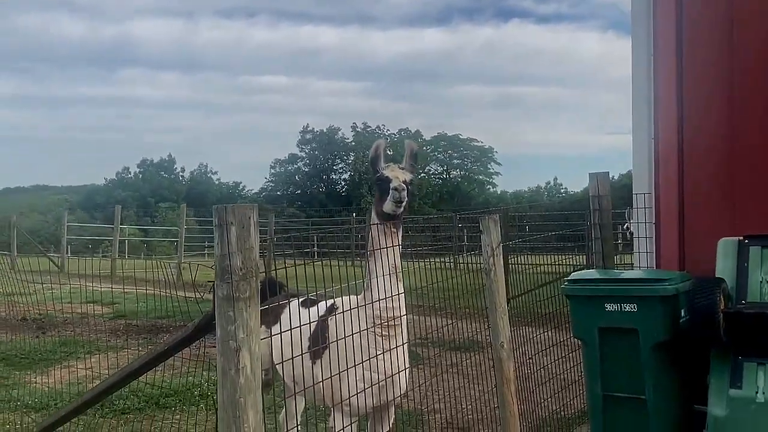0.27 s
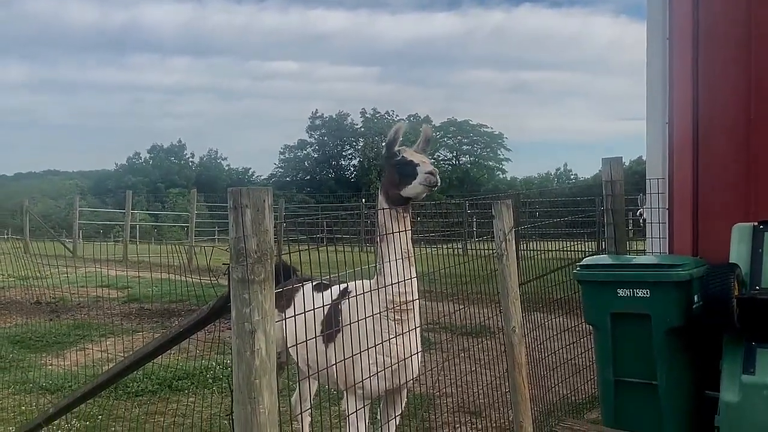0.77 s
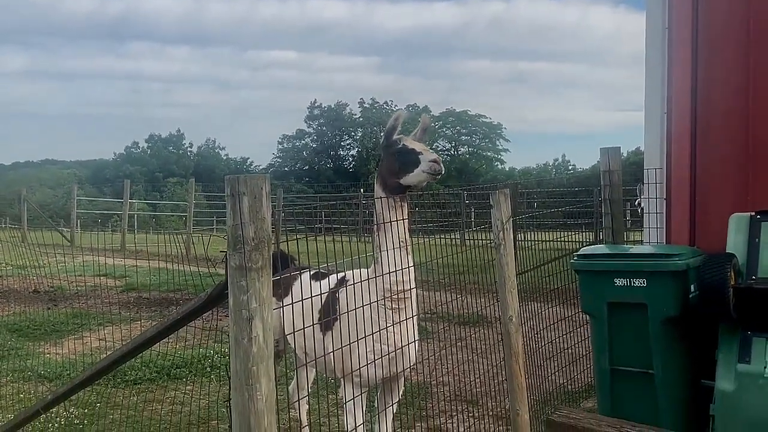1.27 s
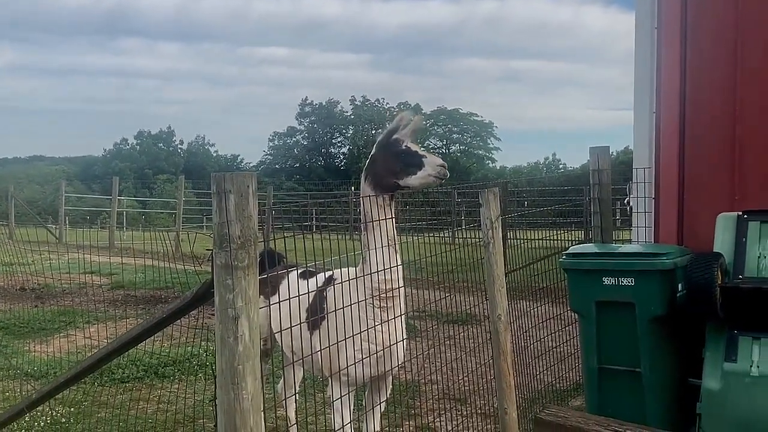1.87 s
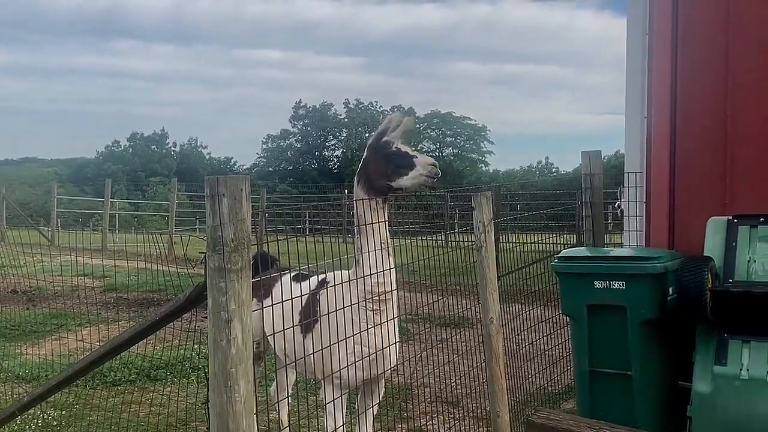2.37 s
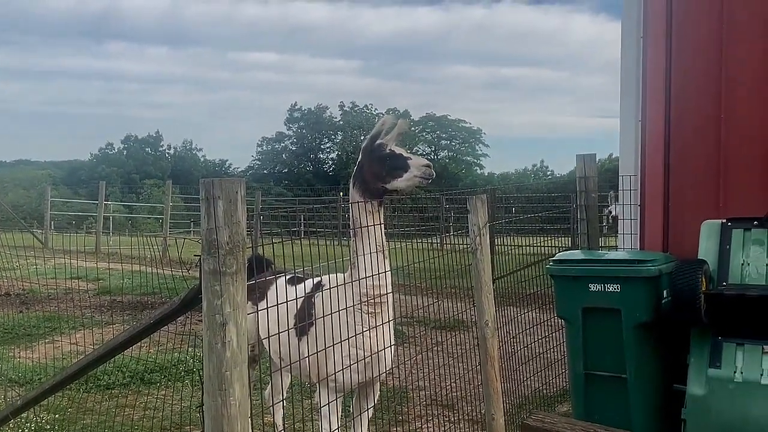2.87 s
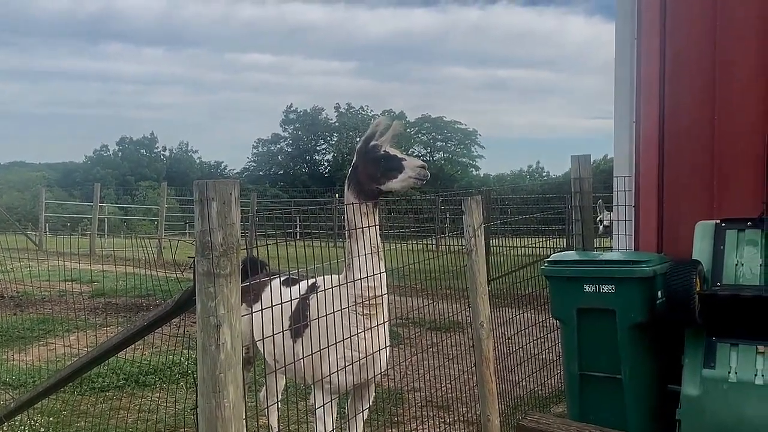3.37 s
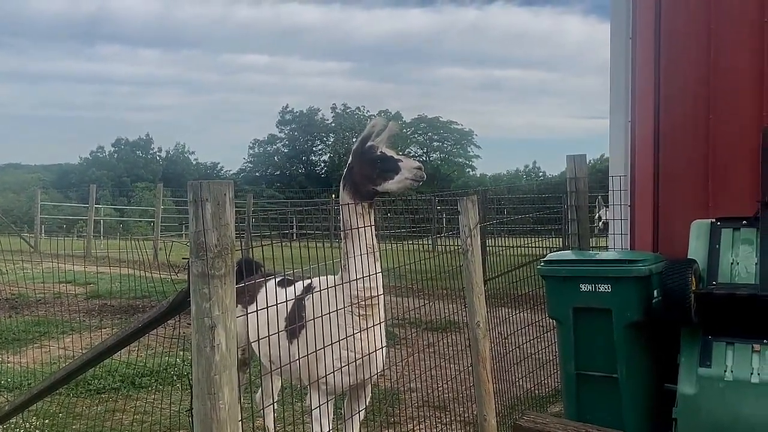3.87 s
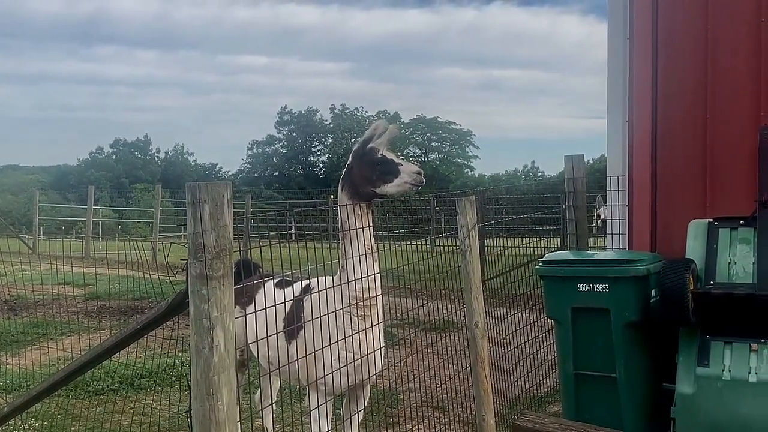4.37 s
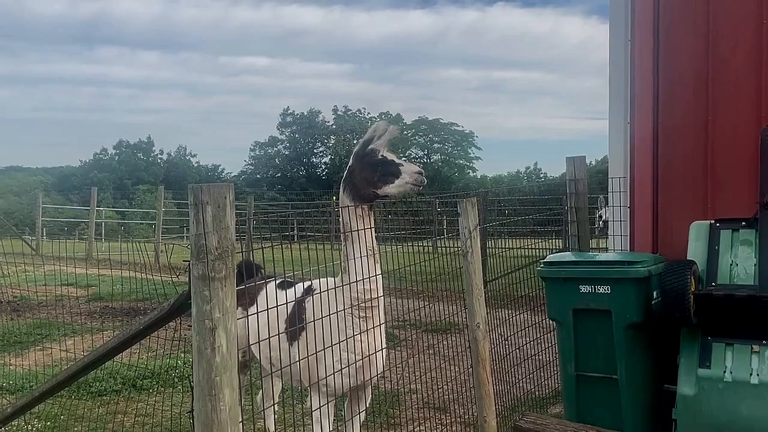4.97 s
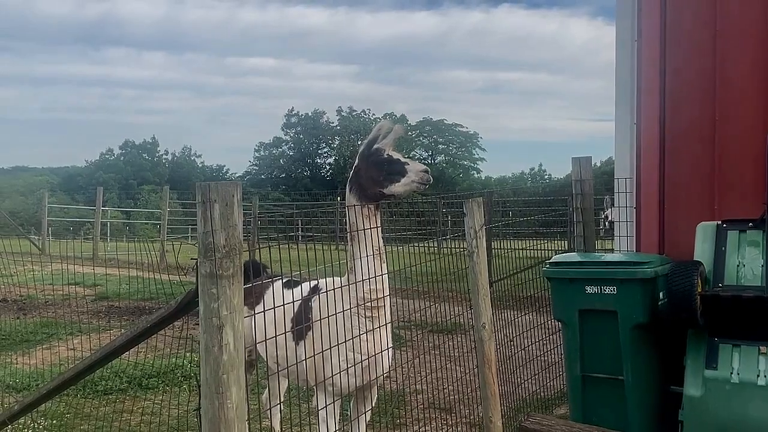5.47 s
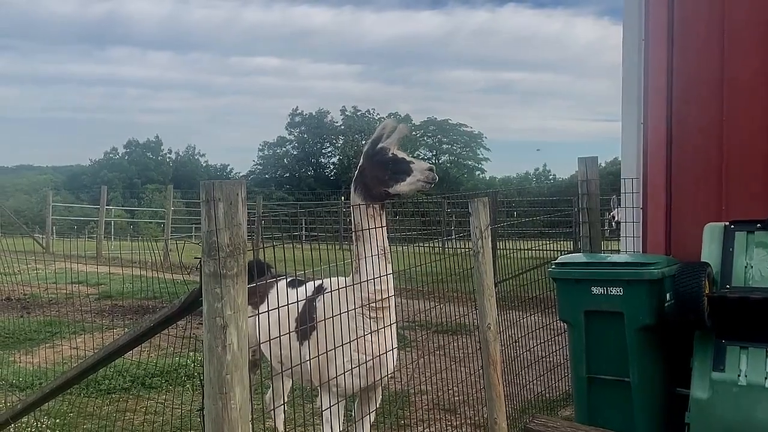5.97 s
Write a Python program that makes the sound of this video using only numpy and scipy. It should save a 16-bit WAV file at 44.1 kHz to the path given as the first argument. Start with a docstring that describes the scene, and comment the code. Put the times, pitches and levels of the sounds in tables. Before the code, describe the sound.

Small birds whistle, pip and twitter around a quiet farmyard, with low handling rumble and thumps on the microphone for the first two seconds.

```python
"""Small birds whistle, pip and churr around a farmyard over a far chorus and a light breeze.
From the start a hand shifts on the phone: filtered noise rumbles and decaying sines thump for two seconds.
Near 0.9 s the loudest song, one sine on a pitch path, slides down and slowly up; pips, flicks and twitters
recur throughout. Churrs come from 2.6 s, when a hollow whoosh of noise passes; winding songs run to the end.
The barn and the trees scatter the calls as sparse, decaying echoes."""
import sys
import numpy as np
from scipy import signal
from scipy.fft import rfft, irfft
from scipy.io import wavfile
from scipy.ndimage import uniform_filter1d

SR = 44100
rng = np.random.default_rng(int(sys.argv[2]) if len(sys.argv) > 2 else 0)


def file_out(sig):
    """Save sig as 16-bit WAV at sys.argv[1]."""
    # one column per channel
    cols = np.atleast_2d(sig).T
    # limit, then scale
    lim = np.clip(cols, -1, 1)
    pcm = np.round(lim * 32767).astype(np.int16)
    wavfile.write(sys.argv[1], SR, pcm)


N = 274013
TOP_HZ = 15000


def undb(db):
    """Decibels to gain."""
    return 10 ** (np.asarray(db) / 20)


def unit(x):
    """Scale to rms 1."""
    return x / np.sqrt(np.mean(x ** 2))


def walk(rate_hz, size):
    """A random wander with a spread near 1: random points at a rate, joined by lines."""
    at = np.arange(size) * rate_hz / SR
    points = rng.standard_normal(int(at[-1]) + 2)
    return 1.2 * np.interp(at, np.arange(len(points)), points)


def curve(rows):
    """The columns of a timed table, sample by sample."""
    s, *columns = np.transpose(rows)
    return [np.interp(np.arange(N) / SR, s, column) for column in columns]


def progress(length_s):
    """0 to 1 over a length, in at least 64 samples."""
    return np.linspace(0, 1, max(int(length_s * SR), 64))


def arc(length_s, first, middle, last):
    """A parabolic pitch path through three pitches."""
    return np.polyval(np.polyfit([0, .5, 1], [first, middle, last], 2), progress(length_s))


def add(track, s, sound):
    """Mix a sound into a track at a time in seconds."""
    i = int(s * SR)
    lo, hi = max(i, 0), min(i + sound.shape[-1], N)
    if hi > lo:
        track[..., lo:hi] += sound[..., lo - i:hi - i]


# Stereo width of the noises, narrow in the bass. Each row: frequency in Hz, side minus mid in dB.
WIDTH = [(30, -31), (55, -20), (85, -9), (160, -1), (300, -4), (750, -2.5), (5000, -3)]


def noise(colour):
    """Stereo noise of rms 1, shaped by a spectrum and by the width of the two microphones."""
    log_hz = np.log(np.arange(N // 2 + 1) * SR / N + 1)
    hz, db = np.transpose(colour)
    width_hz, side_db = np.transpose(WIDTH)
    gain = undb(np.interp(log_hz, np.log(hz), db, left=-90, right=-90))
    mid, side = rfft(rng.standard_normal((2, N))) * gain
    side = side * undb(np.interp(log_hz, np.log(width_hz), side_db))
    return unit(irfft(np.array([mid + side, mid - side]), N))


def ports(x, lag_ms, pan_db):
    """A bird off centre: the right channel lags, and left minus right is pan_db."""
    hz = np.arange(N // 2 + 1) * SR / N
    late = irfft(rfft(x) * np.exp(-2j * np.pi * hz * lag_ms / 1000), N)
    return np.array([x * undb(pan_db / 2), late * undb(-pan_db / 2)])


def yard(x, wet_db, t60_s, side_db=-3):
    """Walls, fences and foliage return sparse random echoes that decay after the direct sound."""
    t = np.arange(SR) / SR
    fade = undb(-60 * t / t60_s) * (1 - np.exp(-t / 0.0016))
    sparse = rng.random((2, SR)) < .08
    mid, side = rng.standard_normal((2, SR)) * fade * sparse
    echoes = mid + undb(side_db) * np.array([side, -side])
    echoes /= np.sqrt(np.sum(echoes ** 2) / 2)
    source = x[:1] * 0.28 + x[1:] * 0.79
    return x + undb(wet_db) * signal.fftconvolve(source, echoes, axes=1)[:, :N]


def syrinx(hz, overtone_db, waver=0.0073, flutter_db=2.5, edge=0.16):
    """A sine with two weak overtones on a pitch path; pitch and strength tremble a little."""
    size = len(hz)
    phase = 2 * np.pi * np.cumsum(hz * (1 + waver * walk(259.9, size))) / SR
    tone = 0
    for k in range(3):
        audible = (k + 1) * hz < TOP_HZ
        tone = tone + undb(overtone_db * np.sqrt(k)) * np.sin((k + 1) * phase) * audible
    swell = signal.windows.tukey(size, np.clip(2 * edge, .05, 1))
    return np.sqrt(2) * tone * swell * undb(flutter_db * walk(67.2, size))


def hoarse(tone, share, rate_hz=700):
    """Irregular vibration spreads a share of a tone's power into a rasp around it."""
    share = np.clip(share, 0, 1)
    return tone * (np.sqrt(1 - share) + np.sqrt(share) * walk(rate_hz, len(tone)))


# Hush spectrum. Each row: frequency in Hz, relative density in dB per Hz.
AIR = [(120, -5.5), (220, -2), (500, -9.5), (900, -15.5), (1150, -21.5), (1550, -18.5), (2100, -13.5),
       (3500, -15.5), (4700, -12), (6100, -15.5), (8000, -34.5), (11000, -33), (15000, -50.5)]
AIR_DB = -61.5
# Whoosh. Each row: time in seconds, level in dB.
WHOOSH = [(1.9, -67.5), (2.3, -59.5), (2.58, -56), (2.8, -56.5), (2.95, -74), (3.1, -70), (3.15, -54.5),
          (3.25, -77), (3.7, -65), (4.15, -66.5), (4.6, -82.5), (5.3, -64), (5.9, -76.5)]
# Each row: frequency in Hz, relative density in dB per Hz.
WHOOSH_COLOUR = [(200, -20.5), (280, -1), (340, -2.5), (500, -19)]
# Passing rustles. Each row: time in seconds, level in dB.
RUSTLE = [(.7, -70), (.9, -68.5), (1.3, -73), (1.6, -72.5), (5.1, -79), (5.3, -64), (5.55, -66), (5.8, -83)]
# Each row: frequency in Hz, relative density in dB per Hz.
RUSTLE_COLOUR = [(450, -14), (800, -1.5), (1100, -8), (1600, -6), (2200, -26)]


def air():
    """Filtered noise: the hush of open fields and leaves, a hollow whoosh and faint rustles."""
    hush = noise(AIR) * undb(AIR_DB + .5 * walk(4.4, N))
    whoosh = noise(WHOOSH_COLOUR) * undb(curve(WHOOSH)[0])
    rustle = noise(RUSTLE_COLOUR) * undb(curve(RUSTLE)[0])
    return hush + whoosh + rustle


# Far chorus. Each row: time in seconds, low, middle and high voices in dB before the register gain.
CHORUS = [(0.0, -52, -71, -64), (0.34, -68, -74, -63.5), (0.6, -68, -67.5, -63.5),
          (0.88, -59.5, -57.5, -56.5), (1.16, -65, -60, -62), (1.78, -67, -62, -60.5),
          (2.17, -73.5, -65.5, -67), (2.4, -66, -67.5, -66), (2.86, -64.5, -61.5, -60.5),
          (3.12, -67, -67, -57.5), (3.56, -69.5, -66.5, -63), (3.8, -62, -65.5, -66),
          (4.25, -62.5, -73, -62.5), (4.78, -61.5, -61.5, -66.5), (5.22, -64, -71.5, -63),
          (5.47, -60, -65, -64), (5.87, -62.5, -79, -60.5), (6.2, -66, -65, -63)]
# Registers. Each row: lowest Hz, highest Hz, gain in dB.
CHORUS_VOICES = [(1890, 3150, -1.5), (3154, 4200, -1.5), (4230, 5400, -2.5)]


def chorus(count=200):
    """Many far birds in three registers, mostly a wash of echoes that swells and thins."""
    total = 0
    for (low_hz, high_hz, gain_db), swell_db in zip(CHORUS_VOICES, curve(CHORUS)):
        out = np.zeros(N)
        for k, (when, pitch, length, bend, end) in enumerate(rng.random((count, 5))):
            shape = arc(.014 + .025 * length, 1 + .25 * (bend - .5), 1, 1 + .25 * (end - .5))
            hz = (low_hz + (high_hz - low_hz) * pitch) * shape
            add(out, (k + when) / count * N / SR, syrinx(hz, -36, waver=.015))
        echoes = yard(np.array([out, out]), wet_db=7, t60_s=.7, side_db=-2)
        total = total + unit(echoes) * undb(swell_db + gain_db)
    return total


# Buffeting from the shifting hand. Each row: time in seconds, level in dB before RUMBLE_LIFT_DB.
HAND = [(0.0, -39.5), (0.24, -37), (0.29, -42), (0.64, -30.5), (0.66, -41.5), (0.87, -35.5), (0.89, -48),
        (0.96, -38.5), (1.33, -47.5), (1.49, -32.5), (1.57, -45), (1.8, -35.5), (2.0, -42.5), (2.12, -35.5),
        (2.25, -50), (2.38, -62)]
# Buffeting from the breeze. Each row: time in seconds, level in dB before RUMBLE_LIFT_DB.
BREEZE = [(2.4, -57.5), (2.8, -64.5), (3.58, -58.5), (3.62, -50.5), (3.93, -55), (3.99, -49), (4.04, -56),
          (4.53, -52.5), (4.54, -47.5), (4.78, -64), (4.82, -54), (5.61, -52.5), (6.11, -61), (6.2, -71)]
# Each row: frequency in Hz, relative density in dB per Hz.
RUMBLE_COLOUR = [(12, -72.5), (25, -18.5), (40, -3.5), (60, 2), (90, -3.5), (125, -11), (180, -16),
                 (300, -52)]
# Each row: frequency in Hz, relative density in dB per Hz.
RUB_COLOUR = [(70, -41), (120, -6), (225, -2.5), (300, -9.5), (400, -29.5), (700, -35), (1200, -43)]
# Finger knocks on the case. Each row: start in seconds, level in dB before onset and decay,
# pitch in Hz, scuff peak in dB.
THUMPS = [(0.043, -33, 131, -55), (0.154, -19, 163, -37), (.17, -21, 109, -64), (.397, -17, 199, -42.5),
          (.416, -19, 138, -45), (0.504, -22, 160, -66), (0.547, -19.5, 183, -54),
          (0.607, -18.5, 84.4, -53), (0.766, -21, 114, -51), (.789, -21.5, 132, -60),
          (0.817, -17.5, 197, -43), (.848, -18, 72.6, -44.5), (.888, -27, 174, -39), (.958, -23, 74.4, -55),
          (1.032, -22, 77, -47), (1.21, -23, 129.5, -61), (1.43, -24, 170, -43), (1.466, -20.5, 85, -49),
          (1.682, -21, 128, -70), (1.883, -24.5, 74.2, -51), (2.094, -20.5, 118, -36),
          (2.099, -25.5, 385, -61)]
RUMBLE_LIFT_DB, HAND_RUB_DB = 4.5, -56.5
BREEZE_RUB_DB = -9  # rustle relative to the table's buffeting
HAND_REST_S, HAND_RELEASE_S = 2.16, 0.089  # rubbing starts to fade, fade length
SCUFF_S = 0.018  # knock to scuff peak


def handling(ring_cycles=1.72):
    """Low noise buffets and rubs the phone; knocks are sines that die in a few cycles, with scuffs."""
    t = np.arange(SR // 5) / SR
    buffet = undb(curve(np.vstack([HAND, BREEZE]))[0])
    grip = np.clip((HAND_REST_S - np.arange(N) / SR) / HAND_RELEASE_S + 1, 0, 1)
    hand_rub = grip * undb(HAND_RUB_DB + 4.8 * walk(23, N))
    rub = hand_rub + (1 - grip) * buffet * undb(BREEZE_RUB_DB)
    out = noise(RUMBLE_COLOUR) * buffet * undb(RUMBLE_LIFT_DB + 1.2 * walk(21, N))
    scuff = (t / SCUFF_S * np.exp(1 - t / SCUFF_S)) ** 2
    onset = (1 - np.exp(-t / 0.0018)) ** 2
    for s, db, hz, scuff_db in THUMPS:
        ring = np.sin(2 * np.pi * hz * t) * np.exp(-t * hz / ring_cycles)
        add(out, s, undb(db) * ring * onset)
        add(rub, s, undb(scuff_db) * scuff)
    return out + noise(RUB_COLOUR) * rub


# Husky two-note calls. Each row: start in seconds, pitch in Hz, level in dB.
LISPS = [(3.003, 9500, -73), (3.859, 9360, -78.5), (4.841, 9570, -77.5), (6.024, 9000, -79.5)]
LISP_NOTE_S, LISP_SECOND_S = 0.059, .3
LISP_STEP, LISP_SECOND_DB = .72, -4  # second note relative to the first: pitch ratio, level


def lisper(husk=0.86):
    """A thin, husky note bends over, and a lower one slides on down from it."""
    out = np.zeros(N)
    for s, hz, db in LISPS:
        first = syrinx(hz * arc(LISP_NOTE_S, 1.005, 1.0, .93), -48, waver=0.0199)
        second = syrinx(hz * LISP_STEP * arc(LISP_SECOND_S, 1.1, 1, 0.81), -50, waver=0.028)
        add(out, s, hoarse(first, husk) * undb(db))
        add(out, s + LISP_NOTE_S, hoarse(second, husk) * undb(db + LISP_SECOND_DB))
    return yard(ports(out, lag_ms=0.0078, pan_db=0), wet_db=13.0, t60_s=0.73, side_db=3.5)


# Buzzy notes. Each row: start in seconds, length in seconds, first Hz, last Hz,
# mean sweeps per second, sweep depth either way in Hz, level in dB.
BUZZES = [(2.562, .15, 3300, 7100, 62, 1280, -61.5), (0.37, 0.57, 4870, 4200, 60, 610, -68.5),
          (4.318, .045, 5600, 5100, 110, 520, -67), (4.446, .05, 5200, 5200, 137, 590, -66),
          (5.2, .48, 1950, 2030, 35, 124, -64)]


def buzzers():
    """The pitch falls and snaps back many times a second."""
    out = np.zeros(N)
    for s, length_s, first_hz, last_hz, rate_hz, depth_hz, db in BUZZES:
        u = progress(length_s)
        cycle = np.cumsum(rate_hz * (1 + 0.159 * walk(40, len(u)))) / SR % 1
        hz = first_hz + (last_hz - first_hz) * u + depth_hz * (1 - 2 * cycle)
        note = hoarse(syrinx(hz, -36, edge=.28), .25) * np.sin(np.pi * cycle)
        add(out, s, note * undb(db))
    return yard(ports(out, lag_ms=0.011, pan_db=-12), wet_db=4, t60_s=.32)


# Churrs. Each row: start in seconds, note length in seconds (before a 0.02 s overlap),
# warble length in seconds, then note, rasp, warble and upper voice in dB.
CHURRS = [(2.654, 0.11, 0.1, -62.5, -55.5, -61, -58), (3.598, 0.093, 0.16, -59, -54.5, -59, -56.5),
          (4.716, .105, .075, -64, -66, -56.5, -55.5)]
CHURR_HUSK = 0.22
WARBLE_RATE_HZ, LOWER_HZ, UPPER_HZ, WARBLE_DEPTH_HZ = 23, 1480, 2200, 330
RASP_HZ, RASP_RISE_HZ, RASP_WANDER_HZ = 2200, 420, 240


def churrer():
    """A nasal note under a rasp, then a warble: the two sides of the syrinx swing oppositely."""
    out = np.zeros(N)
    for s, lead_s, warble_s, note_db, rasp_db, warble_db, upper_db in CHURRS:
        u = progress(lead_s + .02)  # overlaps the warble
        quaver = 1 + .04 * np.sin(2 * np.pi * 36 * lead_s * u)
        note_hz = (1160 + 240 * u ** 2) * quaver
        note = syrinx(note_hz, -12, waver=.02, edge=.1) * undb(7 * (u - .5))
        add(out, s, hoarse(note, .1, rate_hz=340) * undb(note_db))
        rasp_hz = RASP_HZ + RASP_RISE_HZ * u + RASP_WANDER_HZ * walk(300, len(u))
        rasp = syrinx(rasp_hz, -24, edge=.1)
        add(out, s - .012, hoarse(rasp, CHURR_HUSK, rate_hz=530) * undb(rasp_db))
        sway = np.sin(2 * np.pi * WARBLE_RATE_HZ * warble_s * progress(warble_s))
        lower = syrinx(LOWER_HZ + WARBLE_DEPTH_HZ * sway, -22, waver=.025, edge=.06) * undb(2.5 * sway)
        upper = syrinx(UPPER_HZ - WARBLE_DEPTH_HZ * sway, -22, waver=.08, edge=.1)
        warble = lower * undb(warble_db) + upper * undb(upper_db)
        add(out, s + lead_s, hoarse(warble, CHURR_HUSK, rate_hz=580))
    return yard(ports(out, lag_ms=.22, pan_db=-2.5), wet_db=1, t60_s=.55, side_db=0)


# Trills of downward slurs. Each row: start in seconds, number of slurs, gap in seconds,
# pitch in Hz, mean level in dB.
TRILLS = [(.638, 3, 0.05, 4230, -66), (3.699, 3, .054, 4200, -64), (4.255, 3, 0.048, 4190, -66),
          (4.795, 3, 0.047, 5210, -63.5), (4.943, 2, .055, 4810, -62.5), (5.012, 3, .054, 4200, -71),
          (5.119, 3, 0.047, 5200, -68), (5.372, 3, 0.057, 4940, -64)]
SLUR_S, SLUR_SHAPE = .023, (1.045, 0.96, .94)  # pitch ratios
TWITTER_STARTS_S, TWITTER_GAP_S = (.394, .485), .0655
TWITTER_S, TWITTER_HZ, TWITTER_DB = 0.015, (4580, 5770, 6600), -64


def twitterers(count=5):
    """Quick, even runs of rising sweeps and falling slurs; note strength varies at random."""
    out = np.zeros(N)

    def note(hz, db):
        """One pitch sweep at a varied level."""
        return syrinx(hz, -36) * undb(db + 1.5 * rng.standard_normal())

    for s in TWITTER_STARTS_S:
        for k in range(count):
            add(out, s + k * TWITTER_GAP_S, note(arc(TWITTER_S, *TWITTER_HZ), TWITTER_DB))
    for s, slurs, gap_s, hz, db in TRILLS:
        for k in range(round(slurs)):
            add(out, s + k * gap_s, note(hz * arc(SLUR_S, *SLUR_SHAPE), db))
    return yard(ports(out, lag_ms=0.01, pan_db=8.0), wet_db=2, t60_s=0.39)


# Double downward flicks. Each row: start in seconds, level of the second stroke in dB.
TSIPS = [(0.08, -55.5), (1.407, -53.5), (3.58, -52), (4.901, -50), (5.36, -68), (5.62, -71)]
TSIP_S, TSIP_HZ = 0.036, (9930, 8280, 7150)
TSIP_GAP_S, TSIP_FIRST_DB = 0.018, -8.5  # first stroke relative to the second
# Dry ticks. Each row: start in seconds, pitch in Hz, level in dB.
TICKS = [(1.735, 8200, -56), (1.768, 8350, -58), (2.709, 7670, -50.5), (3.068, 7150, -56),
         (3.092, 7600, -60), (3.872, 7700, -62), (4.564, 8700, -52), (4.6, 8420, -67), (5.274, 8000, -60),
         (5.326, 5670, -53), (5.856, 8900, -58), (5.884, 8900, -56)]
TICK_S, TICK_SHAPE = 0.011, (1.23, 0.87, 0.92)  # pitch ratios


def tsipper():
    """Needle-thin flicks and ticks, short falling sweeps from a bird at the side."""
    out = np.zeros(N)

    def flick(hz):
        """One slightly hoarse sweep."""
        return hoarse(syrinx(hz, -46, edge=0.11), 0.085)

    for s, db in TSIPS:
        add(out, s, flick(arc(TSIP_S, *TSIP_HZ)) * undb(db + TSIP_FIRST_DB))
        add(out, s + TSIP_GAP_S, flick(arc(TSIP_S, *TSIP_HZ)) * undb(db))
    for s, hz, db in TICKS:
        add(out, s, flick(hz * arc(TICK_S, *TICK_SHAPE)) * undb(db))
    return yard(ports(out, lag_ms=0.0585, pan_db=2.5), wet_db=2.0, t60_s=0.37, side_db=11.5)


# Quick downslurs. Each row: start in seconds, length in seconds, pitch in Hz, level in dB,
# left minus right in dB.
DOWNSLURS = [(.18, 0.048, 1910, -63, -3), (.297, 0.018, 3960, -67, 0), (.425, 0.019, 4000, -63, 3),
             (.547, 0.012, 3470, -63, 2), (.578, 0.015, 2270, -62, 5), (.845, 0.031, 2650, -64, -10),
             (1.215, 0.032, 4250, -59, 9), (1.39, .022, 4600, -59, 2), (1.64, .028, 4850, -66, 8),
             (4.385, 0.036, 4150, -62.5, 4), (5.16, 0.049, 2440, -68, 12), (5.323, 0.048, 4000, -62.5, 2),
             (5.42, .028, 3290, -67, -9), (6.06, 0.04, 2770, -63, -10)]
# Steepening upslurs. Each row: the same columns and units as the downslurs.
UPSLURS = [(.228, .026, 3650, -63, -2), (.318, 0.014, 3720, -63, 6), (.402, 0.017, 3530, -67, 1),
           (1.462, .022, 4300, -61, 1), (1.897, 0.017, 4000, -58, 4)]
# Held whistles that sag a little. Each row: the same columns and units as the downslurs.
HELD = [(0, 0.126, 2153, -65, -9.5), (.712, .016, 2510, -57.5, 7), (.735, 0.11, 2890, -72, -4),
        (1.1, 0.058, 1920, -71.5, -8), (1.28, 0.085, 6360, -67.5, -3), (1.632, 0.05, 2743, -65.5, -6),
        (1.7, 0.063, 1963, -71, 16), (1.88, 0.39, 4040, -68, 1), (1.965, 0.088, 2317, -67, -2),
        (2.1, 0.14, 1973, -69, -4), (2.38, 0.13, 5310, -71.5, 2), (3.345, 0.031, 2970, -63.5, 3),
        (3.415, 0.021, 2900, -73, 3), (3.475, 0.018, 3020, -68, 0), (4.1, .18, 3163, -70.5, 5),
        (4.483, 0.048, 2466, -59.5, 20), (5.65, 0.12, 5360, -68, 5)]
# High seeps that rise and level off. Each row: the same columns and units as the downslurs.
SEEPS = [(.141, 0.21, 8760, -83, -8), (.915, 0.25, 7390, -85, 29), (1.481, 0.25, 7560, -76.5, 4),
         (1.692, 0.0775, 6360, -63, 4), (1.908, 0.055, 6360, -59, 2), (2.25, 0.18, 6250, -74, 4)]
# Pitch ratios at start, middle and end.
DOWN_SHAPE, UP_SHAPE = (1.09, 0.96, .92), (.92, 1, 1.13)
HELD_SHAPE, SEEP_SHAPE = (1.03, 0.97, 0.99), (0.95, 0.98, 1.005)


def whistlers():
    """Four kinds of whistle from all round the yard; the highest and lowest are husky."""
    out = np.zeros((2, N))
    kinds = (DOWNSLURS, DOWN_SHAPE), (UPSLURS, UP_SHAPE), (HELD, HELD_SHAPE), (SEEPS, SEEP_SHAPE)
    for notes, shape in kinds:
        for s, length_s, hz, db, pan_db in notes:
            husk = np.interp(hz, [2100, 2500, 6400, 7400], [.3, .04, .04, .65])
            tone = syrinx(hz * arc(length_s, *shape), -48, edge=.13)
            sides_db = np.array([[pan_db], [-pan_db]]) / 2
            add(out, s, hoarse(tone, husk) * undb(db + sides_db))
    return yard(out, wet_db=0.5, t60_s=0.51, side_db=-1.0)


# Winding notes. Each row: start in seconds, length in seconds, initial level in dB,
# level change over the note in dB, left minus right in dB, first, early, middle, late and last Hz.
WINDING = [(.03, .078, -61, 4, 6, 2900, 3000, 3200, 3600, 4100),
           (.985, .058, -60.5, 0, -5, 2280, 2300, 2400, 2600, 2850),
           (1.522, .043, -56, 0, -8, 3500, 4400, 4300, 3550, 2700),
           (1.563, .046, -53.5, 2, -3, 2750, 3450, 3400, 3200, 2850),
           (1.602, .045, -58, 0, 4, 4950, 4850, 4600, 4200, 3400),
           (1.828, .04, -56, 5, -1, 5000, 4900, 4650, 4200, 3550),
           (2.078, .128, -58, 1, 4, 4750, 4150, 4050, 4050, 3300),
           (2.262, .098, -60, 2, 4, 4400, 4250, 4050, 3950, 3000),
           (2.735, .03, -61, 0, 0, 2600, 2900, 2900, 2750, 2500),
           (2.922, .066, -60, 3, 2, 5100, 4050, 3800, 3750, 4050),
           (2.963, .1, -59.5, -5, 4, 4150, 4780, 4850, 4850, 4870),
           (3.145, .066, -65, 0, -1, 4550, 3800, 3700, 3750, 4050),
           (3.845, .04, -61, 4, 0, 2400, 2650, 2720, 2700, 2500),
           (4.58, .165, -65, 5, 3, 2420, 2520, 2780, 3080, 3850),
           (5.39, .18, -64.5, 7, 5, 5650, 5350, 5250, 5290, 5280),
           (5.465, .135, -59, -2, 8, 2740, 2840, 2820, 2600, 2400),
           (5.72, .14, -63, 0, 1, 2280, 2440, 2400, 2300, 2100),
           (5.865, .13, -66, 0, -3, 2120, 2400, 2600, 2700, 2480),
           (5.985, .056, -61, 0, -4, 1920, 1820, 1790, 1850, 1980),
           (6.05, .11, -63, -5, -8, 3050, 3250, 3480, 3420, 3600),
           (6.095, .113, -59.5, 2, -2, 2950, 2970, 2980, 2850, 1980)]
# Falling chips. Each row: start in seconds, level in dB.
CHIPS = [(2.813, -66), (2.922, -64), (3.031, -60), (3.141, -59), (3.270, -66)]
CHIP_S, CHIP_HZ = 0.0144, (3880, 3370, 2770)


def singers():
    """Song notes on smoothed pitch paths wind up and down, with a run of chips among them."""
    out = np.zeros((2, N))
    for s, length_s, db, change_db, pan_db, *pitches_hz in WINDING:
        u = progress(length_s)
        path_hz = np.interp(u, np.linspace(0, 1, len(pitches_hz)), pitches_hz)
        hz = uniform_filter1d(path_hz, size=len(u) // len(pitches_hz), mode="nearest")
        tone = syrinx(hz, -45, waver=.011, flutter_db=3.2, edge=.12)
        sides_db = np.array([[pan_db], [-pan_db]]) / 2
        add(out, s, tone * undb(db + change_db * u + sides_db))
    for s, db in CHIPS:
        add(out, s, syrinx(arc(CHIP_S, *CHIP_HZ), -45) * undb(db))
    return yard(out, wet_db=0, t60_s=.55, side_db=0)


# Three-pip phrases. Each row: start in seconds, level in dB before PIP_STEPS_DB.
PIPS = [(-.015, -57), (0.493, -54), (1.318, -54), (2.245, -52), (3.194, -53.5), (3.982, -51.5),
        (4.524, -51), (5.087, -50.5), (5.948, -51)]
PIP_GAP_S, PIP_STEPS_DB = .051, (-4.5, -3.5, -2.5)


def pipper():
    """Short arched pips from close by on the left, so their overtones carry."""
    out = np.zeros(N)
    for s, db in PIPS:
        for k, step_db in enumerate(PIP_STEPS_DB):
            hz = arc(0.026, 4392, 4750, 4450) * (1 + 0.0045 * rng.standard_normal())
            pip = syrinx(hz, -20.0, flutter_db=0.9, edge=0.36)
            add(out, s + k * PIP_GAP_S, pip * undb(db + step_db))
    return yard(ports(out, lag_ms=.006, pan_db=8), wet_db=-6.5, t60_s=0.33)


# The loudest song. Each row: time in seconds, pitch in Hz, level in dB.
SLIDE = [(.864, 5550, -59), (.89, 4990, -53.5), (0.912, 4088, -49), (.934, 3760, -46), (0.976, 3496, -59),
         (1.051, 3550, -59), (1.15, 3600, -55.5), (1.251, 3920, -61.5), (1.33, 4200, -56),
         (1.385, 4260, -50.5), (1.415, 4430, -62)]


def slider():
    """One long, nearly pure whistle slides down and slowly up on a smoothed pitch path."""
    s, hz, db = np.transpose(SLIDE)
    t = np.arange(s[0], s[-1], 1 / SR)
    path_hz = uniform_filter1d(np.interp(t, s, hz), size=600)
    tone = syrinx(path_hz, -59.0, waver=0.0045, edge=.02)
    out = np.zeros(N)
    add(out, s[0], tone * undb(np.interp(t, s, db)))
    return yard(ports(out, lag_ms=0.029, pan_db=-2.5), wet_db=-5.0, t60_s=0.45)


def scene():
    """All the birds over the hush, and the hand on the phone."""
    background = air() + chorus() + handling()
    calls = lisper() + buzzers() + churrer() + twitterers() + tsipper()
    songs = whistlers() + singers() + pipper() + slider()
    return background + calls + songs


def record(dry):
    """The phone cuts the top with a steep low-pass."""
    return signal.sosfilt(signal.ellip(8, .2, 70, TOP_HZ, fs=SR, output="sos"), dry)


dry = scene()
out = record(dry)
file_out(out)
```